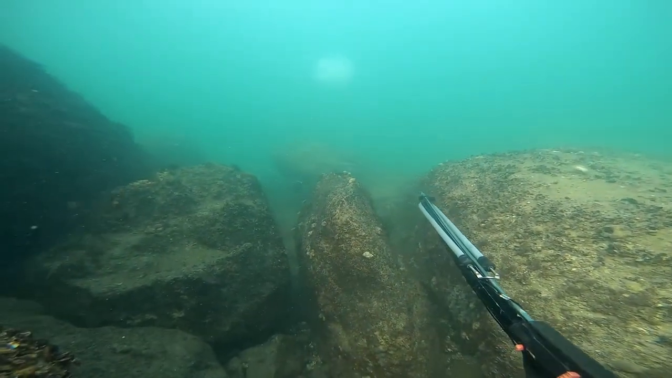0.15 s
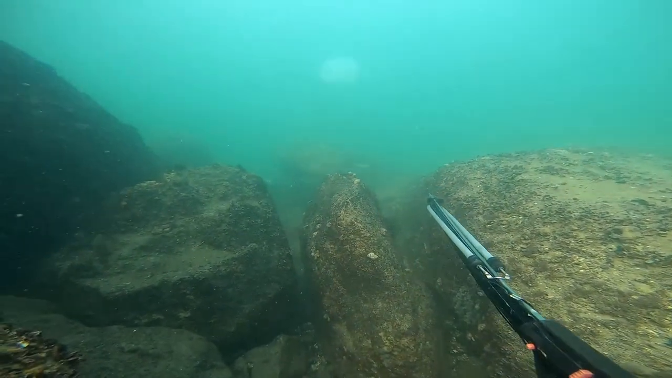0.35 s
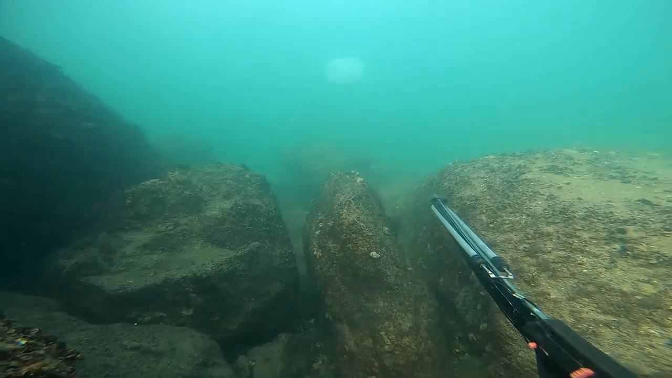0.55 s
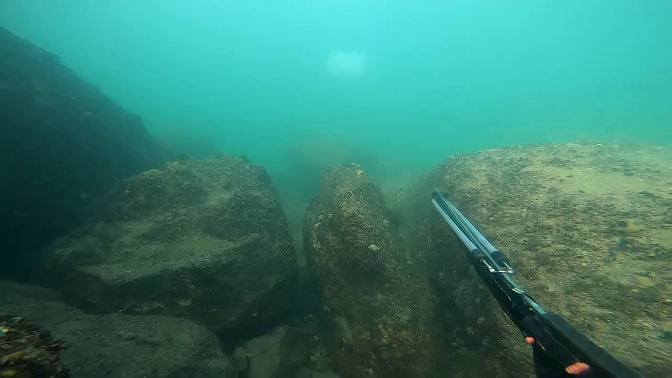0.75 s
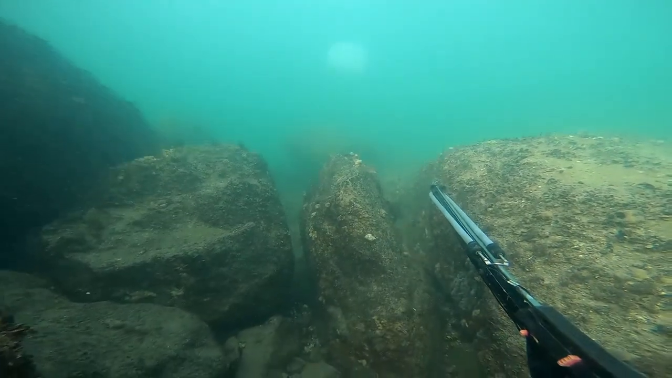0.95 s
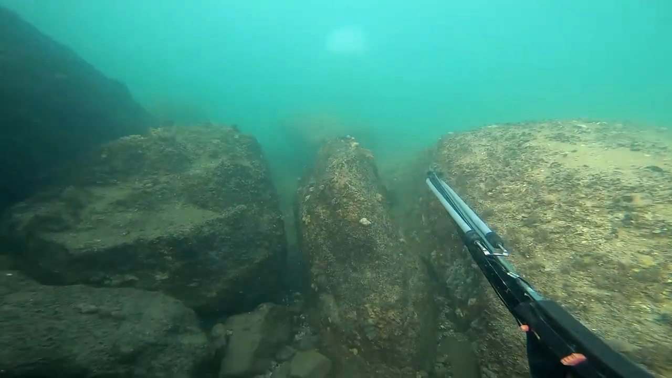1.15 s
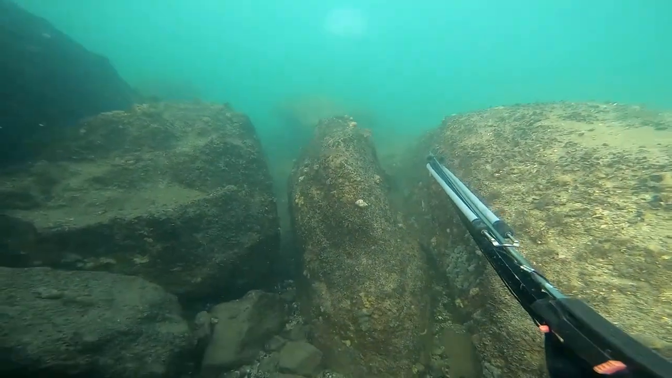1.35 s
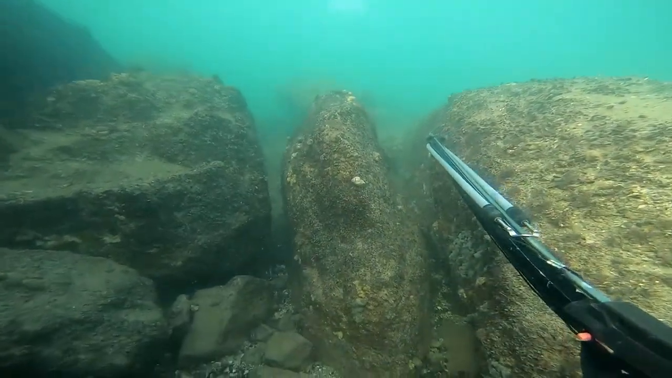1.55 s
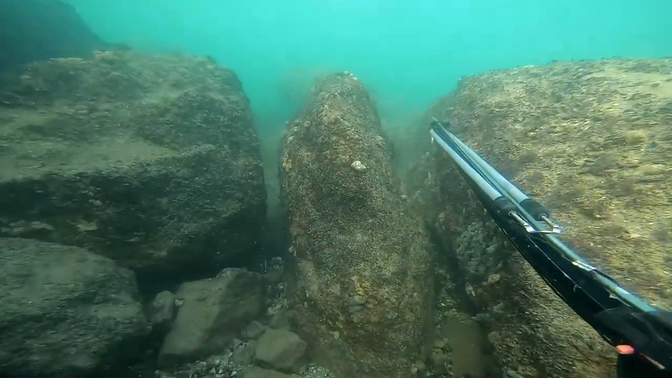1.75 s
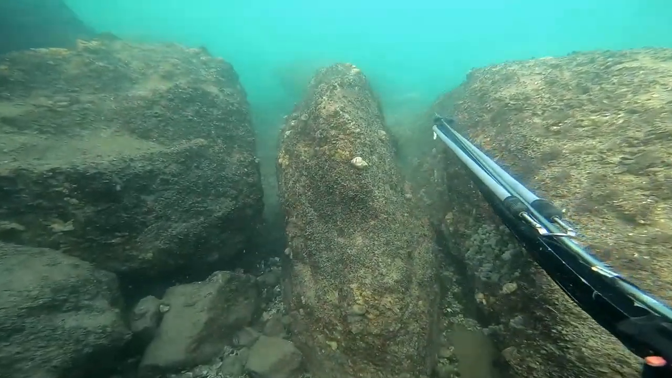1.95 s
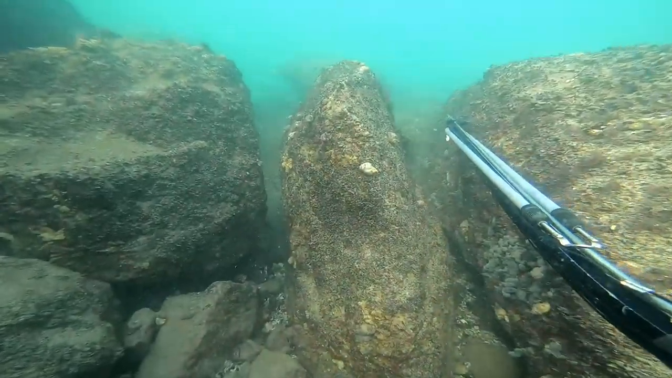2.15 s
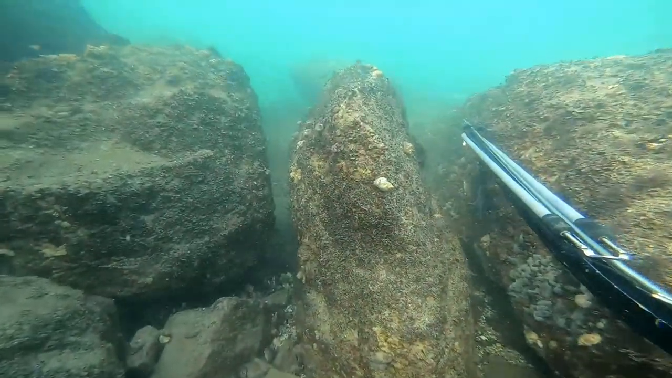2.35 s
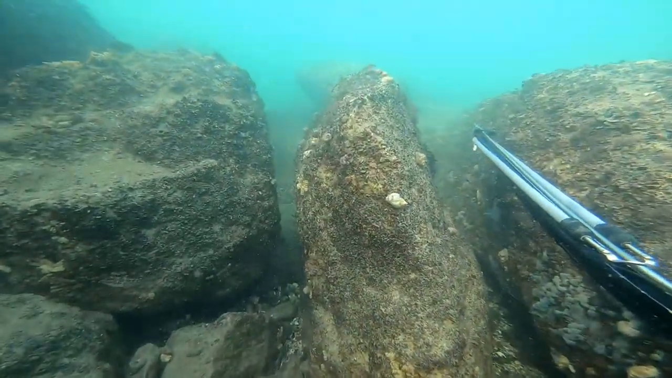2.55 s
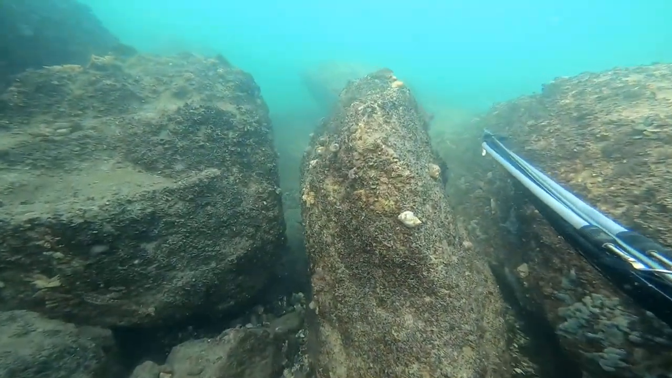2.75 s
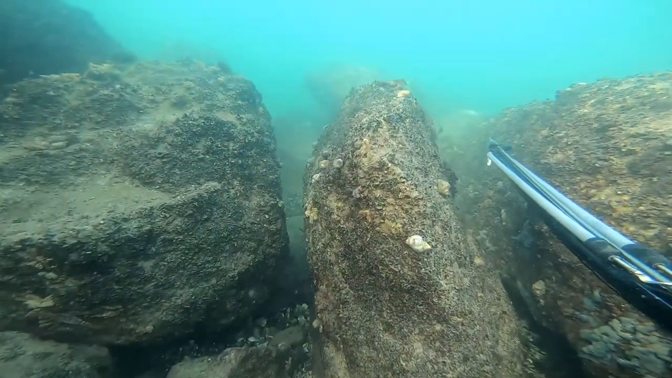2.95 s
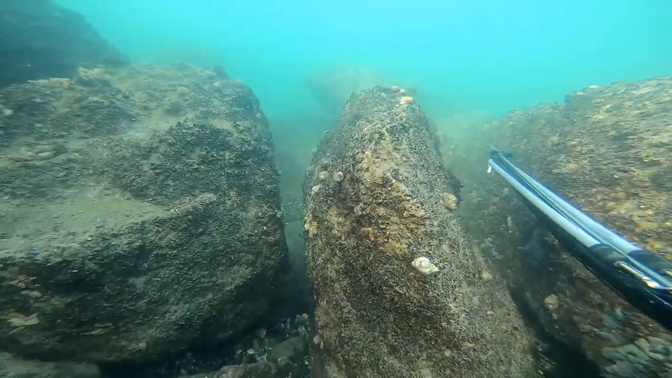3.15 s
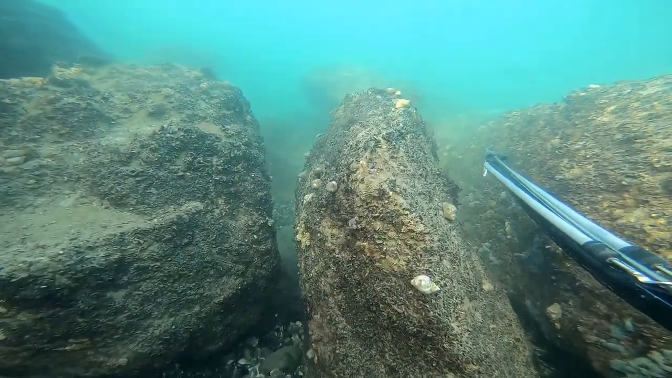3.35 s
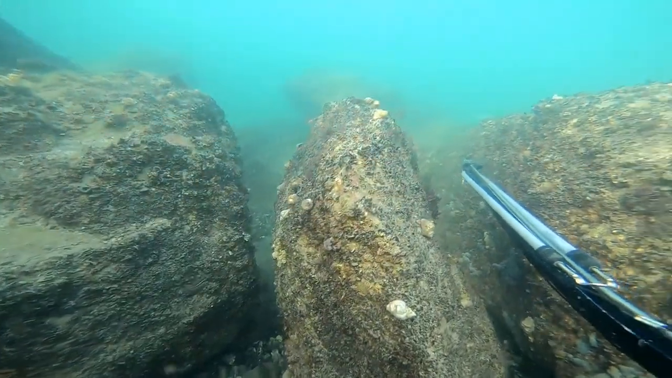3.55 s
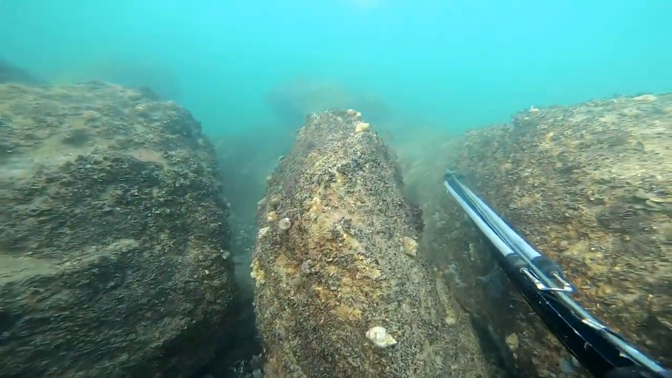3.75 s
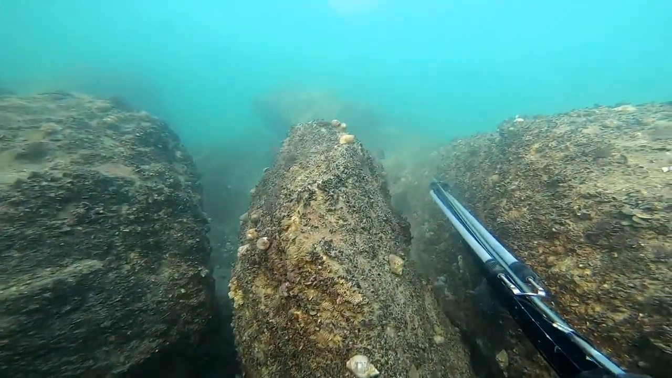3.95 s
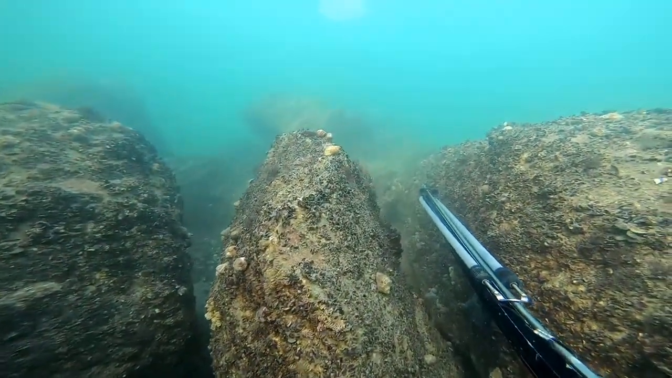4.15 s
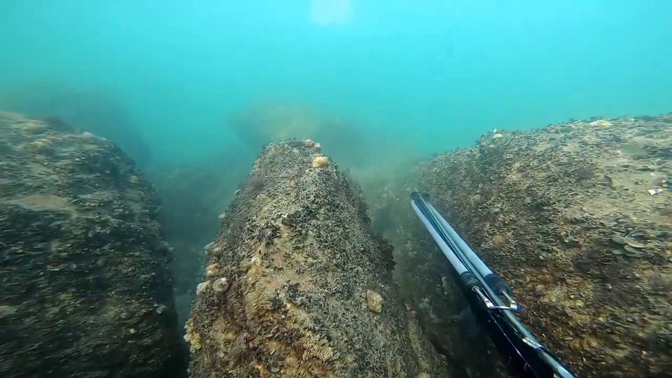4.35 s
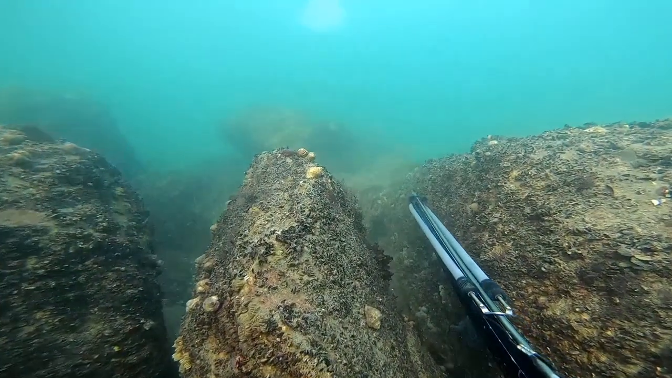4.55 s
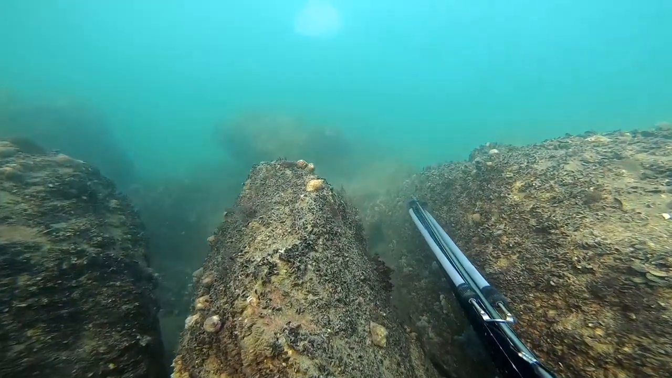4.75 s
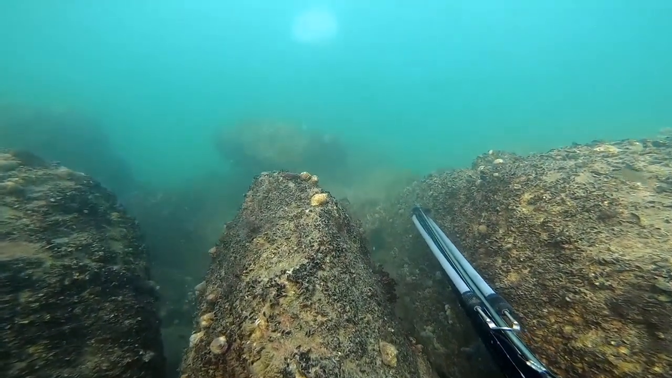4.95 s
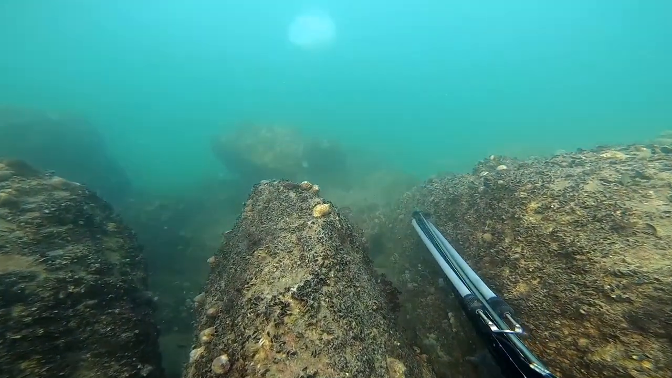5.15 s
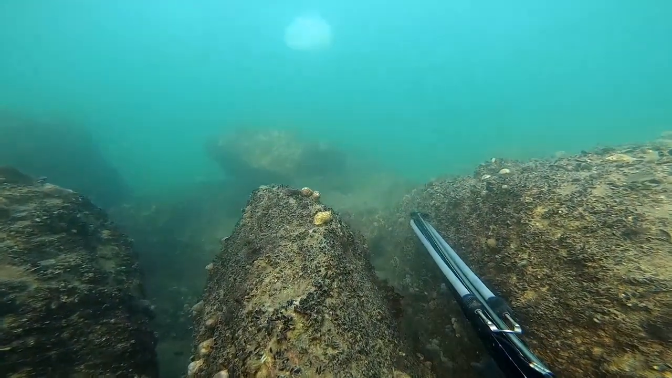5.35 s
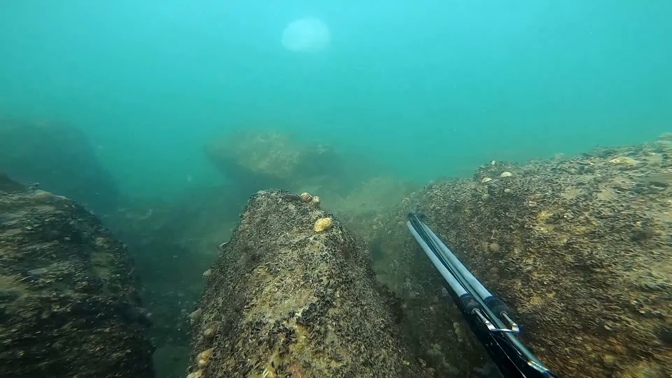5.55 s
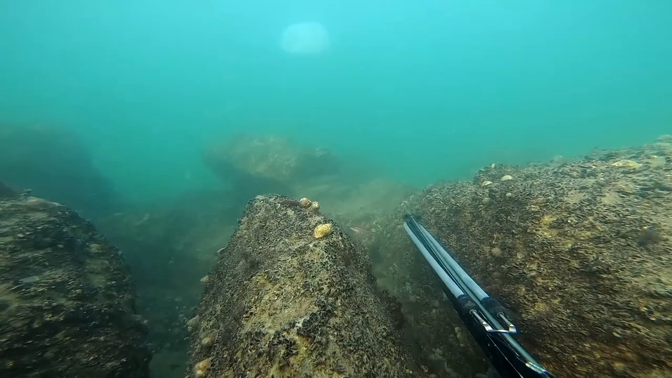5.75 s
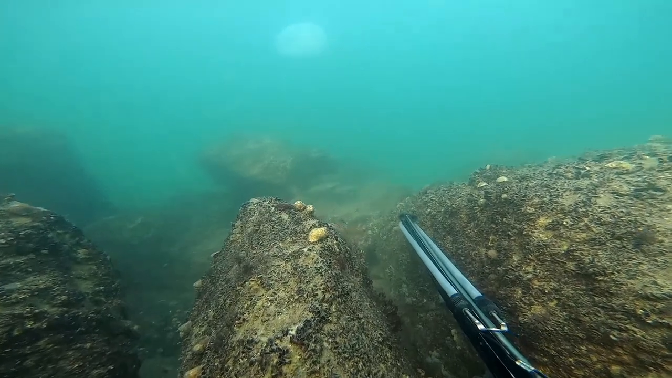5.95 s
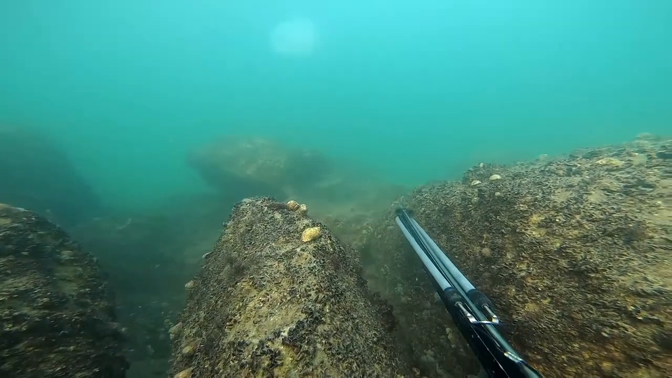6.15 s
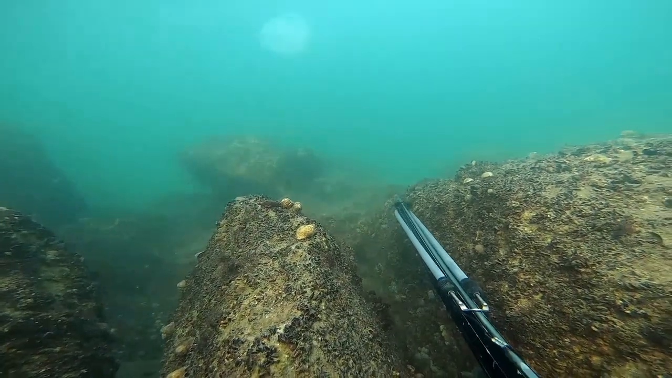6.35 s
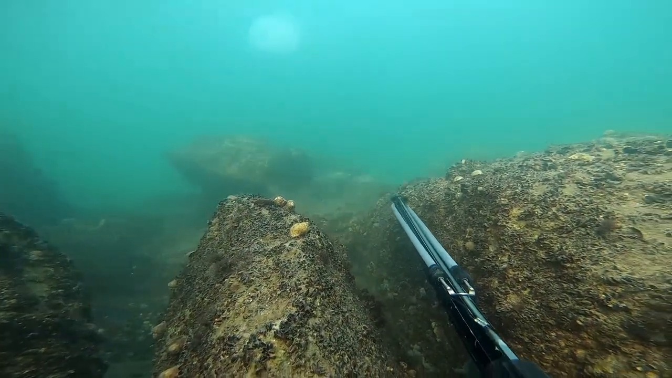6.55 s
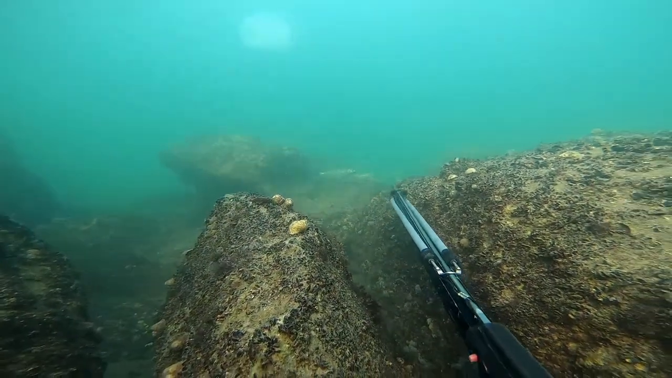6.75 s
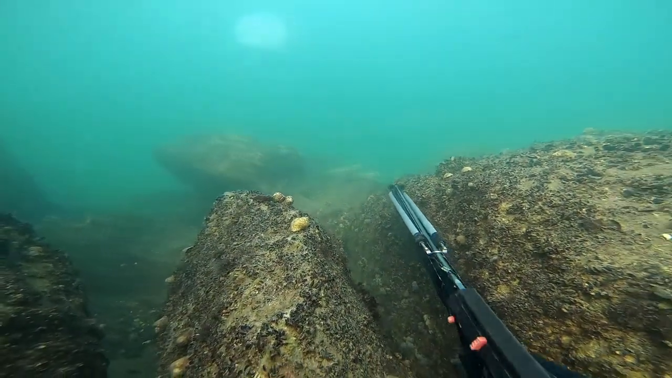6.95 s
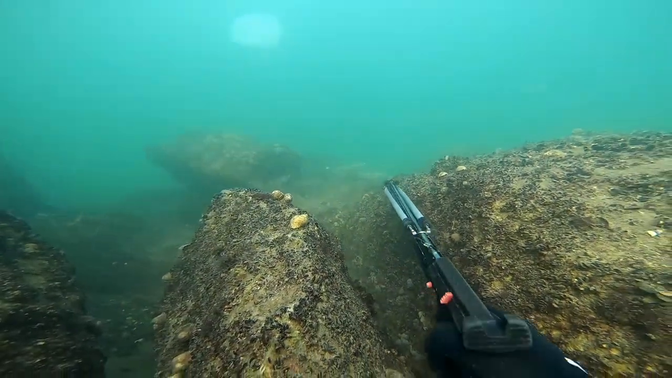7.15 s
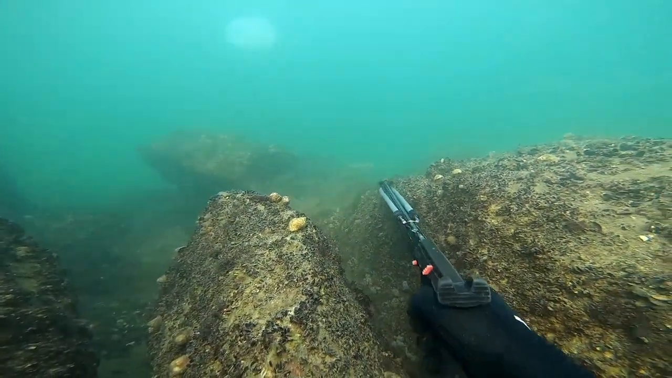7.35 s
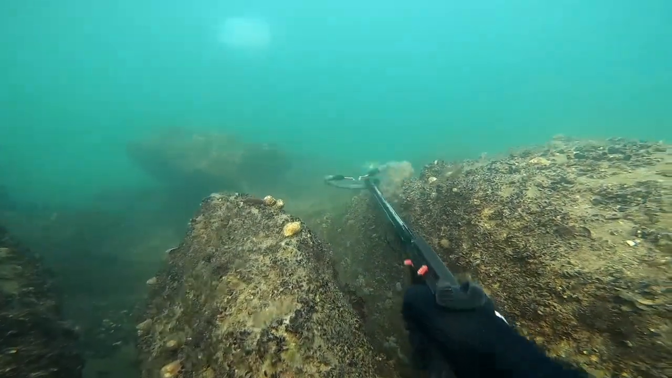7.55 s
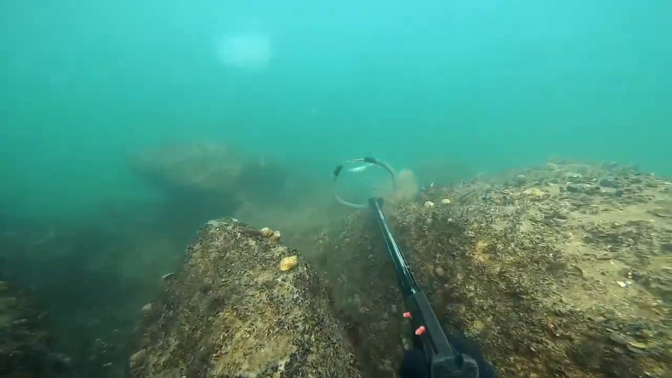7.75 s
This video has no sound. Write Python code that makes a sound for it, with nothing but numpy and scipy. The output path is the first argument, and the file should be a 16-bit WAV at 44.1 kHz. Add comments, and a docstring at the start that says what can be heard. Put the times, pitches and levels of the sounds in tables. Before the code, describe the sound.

Underwater among rocks, faint shrimp crackle runs throughout, with nearer snaps making small hollow pings on the microphone's sealed housing. Water rubs softly past over a low rumble, with slight gurgles and a few dull gear bumps. Near the end a speargun fires with one sharp, loud crack and a recoil thump, followed by a quick shaft rattle, ticking line and a faint fizz.

```python
"""A diver drifts among rocks with a camera in a sealed, ringing housing. From the start, far shrimp
crackle, water rubs past, trapped air gurgles and the swell pushes. Near snaps ping the housing, dull
bumps come through the gear, and now and then a hollow in it hums. At 7.5 s a speargun fires: trigger,
recoil, the crack of the release, then rattling shaft, bubbles, whipping line and a ring of steel.
Sounds are built as two parts: one pushes both microphones in step, the other in opposition."""
import sys
import numpy as np
from scipy import signal
from scipy.fft import rfft, irfft, next_fast_len
from scipy.io import wavfile
from scipy.ndimage import uniform_filter1d

SR = 44100
rng = np.random.default_rng(int(sys.argv[2]) if len(sys.argv) > 2 else 0)


def inscribe(sig):
    """Save sig as 16-bit PCM at rate SR to the path in sys.argv[1].

    A 1-D sig is mono; a 2-D sig holds one channel per row.
    Samples are clipped to [-1, 1] before scaling.
    """
    pcm = np.round(np.clip(np.atleast_2d(sig).T, -1, 1) * 32767)
    wavfile.write(sys.argv[1], SR, pcm.astype(np.int16))


N = 343980

# housing modes in five registers: f/Hz, width/Hz, relative in-step level/dB, relative opposed level/dB
LOW_MODES = [(145, 160, -26, -14), (183.8, 31, 5.5, -5.5), (217, 31, -9, -19.5), (295, 92, -9, -20.5),
             (454, 156, -7, -10.5), (575.4, 47, -3.5, -5)]
ROCKING_MODES = [(837, 39, -46.5, 25), (858, 97, 7.5, 18.5), (1077, 260, -18.5, 18), (1118, 112, 6, 16),
                 (1165, 50, -18.5, 5)]
RINGING_MODES = [(1443, 75, 9.5, -5.5), (1672, 100, 15.5, 9.5), (1838, 195, 4.5, -7.5), (1980, 82, 6, -41),
                 (2427.5, 120, -39, -48)]
UPPER_MODES = [(2840, 73, -5, 1.5), (3033, 270, -7.5, -13.5), (3320, 350, -6.5, -7.5),
               (3580, 320, -13, -18.5)]
TREBLE_MODES = [(4200, 500, -28, 2), (5200, 750, 0.5, 0), (5990, 610, -2.5, -4.5), (6610, 2050, -0.5, -8.5),
                (8000, 430, -8.5, -1.5), (9600, 960, -5.5, -4.5), (13100, 1000, -4, -19)]
# one entry a register, low to treble
REGISTER_BANDS = [(138, 583), (710, 1430), (1300, 1520), (2600, 2400), (4300, 7150)]  # roll-off corners: low f/Hz, high f/Hz
OPPOSED_LAGS = [3, 1.34, 1.58, 0.73, 1.08]  # how far the opposed part trails: phase/rad
CRACKLE_EQ = [-13.5, -7, -5.5, -22, -23.5]  # colour of the far crackle: gain/dB
BLUR_LEVELS = [-117, -100, -76.5, -90, -89.5]  # steady blur of the farthest snaps: level/dB

# ride of the far crackle: t/s, level/dB, brightness/dB
CRACKLE_RIDE = [(0, -60, 0.5), (.55, -61.5, 4), (.95, -57, -1), (1.1, -59.5, -1), (1.25, -50, -2),
                (1.48, -51.5, -4.5), (1.8, -58.5, 1), (2.1, -58, 2), (2.5, -63, 0.5), (3.04, -67, 1),
                (3.6, -64.5, 1), (4.17, -56.5, -2.5), (4.9, -59, 0.5), (5.3, -67, 6.5), (5.65, -64, 2),
                (5.91, -56.5, -2.5), (6.4, -61.5, 1.5), (7.08, -56, -2), (7.8, -59, 0)]
# water dragging past the housing: centre t/s, half length/s, level/dB
DRAGS = [(0.46, 0.067, -67), (0.912, 0.068, -78), (1.61, 0.12, -61), (1.906, 0.31, -69.5),
         (2.288, 0.085, -58), (2.625, .12, -55.5), (2.84, 0.18, -65.5), (3.63, .15, -73),
         (4.108, 0.071, -55.5), (4.212, 0.12, -57), (4.495, 0.072, -67), (4.755, 0.19, -63),
         (5.277, 0.14, -63), (6.02, 0.056, -57), (6.654, 0.035, -63), (7.577, 0.051, -45.5),
         (7.707, 0.059, -47)]
# slow push of the swell: t/s, level/dB
SURGE_RIDE = [(0.0, -86), (0.1, -41.5), (0.21, -77), (0.52, -34), (1.19, -55), (1.75, -41.5), (1.92, -65),
              (2.3, -42), (2.4, -53.5), (2.53, -47), (2.65, -52), (2.82, -54), (3.3, -47.5), (3.34, -46),
              (5.89, -68.5), (6.1, -55.5), (6.37, -72), (6.52, -52.5), (7.06, -61.5), (7.5, -52.5)]
# near shrimp: t/s, level/dB, pop f/Hz, relative brightness/dB, relative thud/dB, bright edge f/Hz
NEAR_SNAPS = [(0.035, -48.5, 1700, -18, -22, 6970), (0.106, -45, 840, -15.5, -11, 2950),
              (0.161, -46.5, 1110, -17, -9, 2920), (0.197, -44, 1620, -24, -5.5, 3020),
              (0.345, -50.5, 866, -13, -22, 3220), (0.367, -46, 1140, -18, -32, 6400),
              (0.429, -42.5, 1160, -16.5, -13, 2820), (0.437, -42.5, 1690, -12.5, -23, 3300),
              (0.489, -50, 1640, -22, -25, 3250), (0.582, -55, 1600, -10, -20, 2950),
              (0.751, -49, 1230, 2, -26, 3300), (0.921, -39, 1800, -28, -12, 3620),
              (0.952, -49, 853, -11, 1, 3340), (1.019, -44.5, 1770, -23, -25, 3370),
              (1.179, -43, 1640, -13, -17, 3460), (1.249, -45, 1670, -15, -15, 3300),
              (1.267, -39.5, 830, -10.5, -19, 3100), (1.315, -45, 1100, -34, -19, 3030),
              (1.358, -53, 1070, -28, -24, 3260), (1.373, -45.5, 1640, -10, -18, 3470),
              (1.431, -38.5, 1560, -28, -8, 3160), (1.487, -36, 1100, -31, -27, 3150),
              (1.501, -38, 1650, -19, -20, 3080), (1.984, -43, 1670, -17, -3, 3430),
              (2.004, -38.5, 1550, -19, -10, 3030), (2.065, -25.5, 1790, -17, -38, 2930),
              (2.151, -50, 814, -23, -18, 3240), (2.259, -53, 1650, -29, -10, 2930),
              (2.357, -50, 1680, -34, -4, 3070), (2.457, -57, 1640, -7, -3, 4930),
              (2.486, -47.5, 860, -12, 1.5, 3150), (2.63, -46.5, 1760, -39, 6.5, 2950),
              (2.687, -47.5, 850, -17, 0, 5600), (2.781, -47, 820, -33, -6, 3010),
              (2.914, -43.5, 855, -16, -18, 3120), (2.978, -42, 1180, -20.5, -29, 3330),
              (3.031, -37.5, 770, -35, 1, 3020), (3.043, -49.5, 1090, -13, 2, 4930),
              (3.232, -47.5, 850, -21, -22, 2990), (3.301, -46.5, 1340, -15, -18, 6840),
              (3.355, -50, 1360, -39, 1.5, 3270), (3.448, -47.5, 1130, -17, -10, 3480),
              (3.476, -55, 1130, -11, -17, 2910), (3.663, -55.5, 1090, -14, -11, 5560),
              (3.752, -51, 1030, -16, -15, 4840), (3.773, -52, 1090, -12, -21, 3220),
              (3.844, -52, 1670, -2, -16, 3330), (3.855, -45.5, 874, -9, -17, 4800),
              (3.951, -46.5, 1130, -14.5, -25, 2980), (3.994, -51, 1180, -16, -11, 3840),
              (3.998, -42, 1170, -14.5, 1, 3110), (4.069, -43.5, 820, -39, -9, 3000),
              (4.093, -46.5, 837, -35, -7, 3110), (4.134, -45, 1670, -16, -11, 3300),
              (4.161, -43, 872, -25, -12, 2990), (4.263, -52, 1700, -11, -12, 3150),
              (4.31, -42.5, 1760, -9, -1.5, 5550), (4.398, -48, 880, -20, -24, 6240),
              (4.554, -48, 795, -13, -22, 5780), (4.664, -44.5, 1700, -13, -11, 3440),
              (4.698, -45.5, 1630, -14, -3, 2980), (4.741, -48, 1800, -17, -2, 3020),
              (4.778, -42, 1130, -20, -26, 3470), (4.843, -46, 1150, -31, -19, 3170),
              (4.917, -32.5, 1565, -17, -23, 2930), (4.96, -49.5, 1150, -10, -21, 2900),
              (5.023, -52.5, 856, -35, 3.5, 3100), (5.115, -48.5, 820, -27, -18, 5400),
              (5.182, -49, 1170, -22, -22, 6430), (5.217, -48, 1330, -15, -21, 5500),
              (5.234, -47.5, 1640, -17, -17, 2900), (5.26, -43, 1660, -18, -16, 3350),
              (5.275, -46.5, 1680, -11, -16, 6030), (5.321, -45.5, 845, -17, -17, 3060),
              (5.367, -45, 1120, -17, -28, 5860), (5.395, -50.5, 880, -27, -6, 3350),
              (5.468, -53.5, 1650, -12, -7, 3430), (5.502, -48.5, 1750, -20, -22, 3450),
              (5.53, -48.5, 856, -16, -7, 3440), (5.551, -48.5, 1730, -13.5, -9, 3360),
              (5.571, -43.5, 1530, -26, -13, 3020), (5.625, -46.5, 1120, -20, -27, 5410),
              (5.751, -45.5, 1170, -17, -27, 3250), (5.767, -45, 1610, -21, -12, 3340),
              (5.907, -48, 1650, -14, -21, 3180), (5.955, -45.5, 1640, -12.5, -13, 3140),
              (6.202, -47.5, 1400, -11.5, -7, 5300), (6.237, -43, 1570, -31, -16, 3050),
              (6.269, -54, 1700, -8, -6, 2990), (6.365, -45.5, 900, -15, -21, 3030),
              (6.397, -57.5, 840, -0.5, -5, 4970), (6.473, -49, 1540, -16, -13, 5740),
              (6.545, -49.5, 1710, -1.5, -9, 4900), (6.559, -47.5, 1630, -13, -25, 3430),
              (6.616, -42.5, 1730, -43, -22, 2950), (6.657, -49, 1580, -21, -17, 3470),
              (6.68, -34, 930, -15.5, -20, 6200), (6.886, -44.5, 1700, -9, -14, 3370),
              (6.906, -42, 810, -25, -29, 3210), (6.979, -43.5, 1700, -29, -24, 3050),
              (7.036, -44, 770, -30, -14, 3120), (7.197, -44, 1790, -24, -25, 6070),
              (7.239, -46, 1730, -27, -15, 3450), (7.247, -50, 1750, -11.5, -17, 6110),
              (7.272, -39, 1560, -22.5, -27, 6000), (7.383, -43, 1110, -14.5, -29, 4950),
              (7.451, -49, 1330, -15, -13, 6100), (7.48, -45.5, 1170, -15, -23, 3310)]
# dull bumps through the diver's body and gear: t/s, level/dB, f/Hz
BODY_BUMPS = [(0.075, -20.5, 58.3), (0.076, -34, 172), (0.799, -39.5, 177), (0.847, -30, 165),
              (0.951, -44, 176), (1.004, -38, 174), (1.183, -40.5, 175), (1.418, -26, 50.4),
              (1.55, -34.5, 184), (1.92, -40, 171), (2.26, -28.5, 172), (2.272, -25, 55),
              (2.483, -33.5, 157), (2.597, -51, 172), (3.031, -34, 167), (3.241, -33.5, 53.3),
              (4.073, -32.5, 225), (4.307, -45, 312), (4.479, -40.5, 221), (4.676, -42.5, 223),
              (4.849, -44, 242), (5.237, -44, 176), (5.6, -45, 370), (5.885, -38, 292), (5.955, -41, 307),
              (5.992, -42.5, 360), (6.557, -28, 175), (6.611, -26.5, 79), (6.617, -25.5, 144)]
# a hollow in the gear humming: centre t/s, half length/s, level/dB, f/Hz
HOLLOW_HUMS = [(0.954, 0.094, -56, 178), (1.62, 0.11, -49.5, 187), (1.85, 0.14, -53.5, 176),
               (2.3, 0.072, -48.5, 175), (4.156, 0.11, -50.5, 225), (4.748, .15, -58, 225),
               (7.3, .2, -60, 183)]
# trigger, release, shaft rattling out, line snapping tight, a tick on the shaft:
# t/s, level/dB, pop f/Hz, relative brightness/dB, relative thud/dB
SHOT_KNOCKS = [(7.526, -37, 1720, -11, -2), (7.537, -30.5, 2200, -5, -0.5), (7.5508, -14.5, 1220, -17, -11),
               (7.5628, -29, 1560, -6, -1.5), (7.5678, -23, 1580, -13, -16),
               (7.5718, -14.5, 1440, -24, -23), (7.5764, -17.5, 1460, -22, -18),
               (7.5813, -18, 1590, -15.5, -13), (7.586, -21, 1500, -13.5, -10),
               (7.5919, -25, 1580, -13, -13), (7.6068, -31, 1520, -22, -0.5),
               (7.6119, -27.5, 1530, -13, -4), (7.668, -51, 1400, -3, -8), (7.734, -47, 1710, -8, -10)]
# kick of the gun: t/s, level/dB, f/Hz, t60/s
RECOIL_JOLTS = [(7.5426, -5.5, 73, 0.086), (7.5467, -5, 172.6, 0.078), (7.575, -8.5, 61.4, 0.095),
                (7.604, -13, 21.3, .3), (7.6066, -11, 276, 0.051), (7.618, -14, 136, 0.087),
                (7.694, -23, 162, 0.041), (7.769, -27.5, 164, 0.042)]
# the sear slips, then lets the shaft go: t/s, level/dB
SEAR_SLIPS = [(7.5463, -13), (7.5479, 3.5)]
# ring of the gun, choked by hand and water: f/Hz, in-step level/dB, opposed level/dB, t60/s
GUN_MODES = [(1090, -37, -1, 0.012), (1270, -8.5, -15, 0.018), (1736, -4.5, -32, 0.0092),
             (2080, -0.5, -13, 0.0068), (3390, -8.5, -28, 0.0067), (4750, -18, -18, 0.0099),
             (7080, -14, -30, 0.0055), (10600, -37, -39, 0.0088), (15500, -48, -48, .006)]
# the line running out and whipping: t/s, tick level/dB, relative brightness/dB
LINE_RIDE = [(7.555, -50, -8), (7.6, -38, -15), (7.63, -44, -17), (7.685, -57, -14), (7.705, -39, -19),
             (7.725, -43.5, -21), (7.75, -42, -16.5), (7.8, -52, -30)]
# steel shaft: f/Hz, level/dB, t60/s, flutter width/Hz; then the start of its ring
SHAFT_MODES, SHAFT_RING_S = [(2445, -41, .4, 50), (7150, -61.5, .9, 420)], 7.588

SHOT_EDGE_HZ, SHOT_UPPER_DB = 3100, -1  # bright edge and upper-mode trim of shot knocks and line ticks


def amp(db):
    return 10 ** (np.asarray(db) / 20)


def unit_rms(x):
    return x / np.sqrt(np.mean(x ** 2, axis=-1, keepdims=True) + 1e-30)


def curve(points, t):
    times, *columns = np.transpose(points)
    return np.squeeze([np.interp(t, times, column) for column in columns])


def add(mix, start_s, sound):
    part = mix[..., round(start_s * SR):][..., :sound.shape[-1]]
    part += sound[..., :part.shape[-1]]


def wobble(span):
    """Two slow random modulators, smoothed twice over span samples."""
    return unit_rms(uniform_filter1d(uniform_filter1d(rng.standard_normal((2, N)), span), span))


def resonance(f, hz, width_hz):
    """One damped mode, with unit gain at its pitch."""
    return 1j * width_hz * f / (hz ** 2 - f ** 2 + 1j * width_hz * f)


def housing(size):
    """The housing's colour as summed modes, indexed (register, in-step or opposed, bin)."""
    f, out = np.fft.rfftfreq(size, 1 / SR) + 1e-3, []
    registers = LOW_MODES, ROCKING_MODES, RINGING_MODES, UPPER_MODES, TREBLE_MODES
    for modes, (low_hz, high_hz), lag in zip(registers, REGISTER_BANDS, OPPOSED_LAGS):
        hz, width_hz, *db = np.transpose(modes)[..., None]
        gains = amp(db)
        if modes is ROCKING_MODES:
            gains[1, 1::2] *= -1  # neighbours rock opposite ways
        response = (gains * resonance(f, hz, width_hz)).sum(axis=1)
        for ratio in (-low_hz / f, f / high_hz):  # stiffness below, mass above: steep skirts
            response /= (1 - ratio ** 2 + 1j * np.sqrt(2) * ratio) ** 2
        response[1] *= np.exp(-1j * lag)
        out.append(response / np.sqrt(np.mean(abs(response[0]) ** 2)))
    return np.array(out)


def pressure(shape, alike=0.33):
    """White pressure on the housing; in-step and opposed modes feel it partly alike."""
    shared, own = rng.standard_normal((2, *shape))
    return np.stack([shared, alike * shared + np.sqrt(1 - alike ** 2) * own], axis=-2)


def far_crackle(t, snaps_per_s=140, ticks_per_s=45, spread_db=6, colour_db=11, t60_s=0.084, hiss_db=-9):
    """Envelope, one a register, of countless far shrimp snaps over their own blur."""
    ride_db, bright_db = curve(CRACKLE_RIDE, t)
    size_db = spread_db * np.minimum(rng.exponential(1, N), 2.8)
    size_db = size_db + colour_db * np.clip(rng.standard_normal((5, N)), -3, 1.6)
    snaps = amp(size_db) * (rng.random(N) < snaps_per_s / SR)
    snaps[4] += 1.94 * amp(size_db[0]) * (rng.random(N) < ticks_per_s / SR)  # thin treble-only ticks
    tails = signal.lfilter([1], [1, -amp(-60 / (t60_s * SR))], snaps)
    bursts = unit_rms(uniform_filter1d(tails, size=60))
    envelope = unit_rms(bursts + amp(hiss_db)) * amp(ride_db + np.array(CRACKLE_EQ)[:, None])
    envelope[3:] *= amp(bright_db)
    return envelope + amp(BLUR_LEVELS)[:, None]


def water_bed(floor_db=-72.5, lump_db=2.84):
    """Far crackle and rubbing water ring the housing, over the surge and the gurgle."""
    t, size = np.arange(N) / SR, next_fast_len(N + 4096)
    drag_power = sum(amp(2 * db) * np.exp(-2 * ((t - s) / half) ** 2) for s, half, db in DRAGS)
    rubbing_db = 10 * np.log10(drag_power + amp(2 * floor_db))
    envelope = far_crackle(t)
    envelope[:2] += amp(rubbing_db + lump_db * wobble(900) + [[0], [-9]])  # lumpy rub in the low end
    drive = pressure((5, N)) * envelope[:, None]
    rung = irfft(rfft(drive, size) * housing(size), size)[..., :N].sum(axis=0)
    return rung + surge(t) + gurgle(amp(rubbing_db - 4))


def surge(t, band_hz=(7, 33)):
    """The swell leans on the housing: a slow sub rumble."""
    band = signal.butter(2, band_hz, "bandpass", fs=SR, output="sos")
    heave = signal.sosfilt(band, pressure((N,)))
    heave /= np.sqrt(uniform_filter1d(heave ** 2, size=9000) + 1e-12)  # level it before the ride
    ride = amp(curve(SURGE_RIDE, t) + [[0], [-17]])
    return unit_rms(signal.sosfilt(band, heave)) * ride * [[1], [-1]]


def gurgle(level, per_s=75, low_hz=190, high_hz=800, cycles=10, climb=0.28, sizes=24):
    """Trapped air squeezed about: small bubbles whose pitch climbs as they die, the high ones weaker."""
    out = np.zeros(N)
    for hz in np.geomspace(low_hz, high_hz, sizes):
        age = np.arange(3000) / SR * hz / cycles
        envelope = age * np.exp(-4.5 * age) * (low_hz / hz) ** 0.51
        blip = envelope * np.sin(2 * np.pi * cycles * (age + climb * age ** 2))
        births = (rng.random(N) < per_s / sizes / SR) * rng.standard_normal(N)
        out += signal.oaconvolve(births, blip)[:N]
    return unit_rms(out) * level * amp([[0], [-12]])


def knocks(rows, t60_s, upper_db, opposed_db, upper_per_db=0, attack_s=0.00053, size=4096):
    """A sharp pulse and its fading scatter off the rocks ring the housing, most near the pop's pitch."""
    split_hz, rocking_db_per_oct, ringing_db_per_oct = 1282, 24.5, 21.5  # low pops rock, high ones ring
    edge_split_hz, edge_db_per_oct = 3740, 3.5  # a low edge tilts the treble toward the upper modes
    usual_db = -44  # hits above this gain upper modes by upper_per_db
    t, f = np.arange(size) / SR, np.fft.rfftfreq(size, 1 / SR)
    response, out = housing(size), np.zeros((2, N))
    share = np.sqrt((abs(response) ** 2).mean(axis=-1, keepdims=True))
    for s, db, pop_hz, bright_db, thud_db, edge_hz in rows:
        burst = pressure((5, size)) * amp(-60 * t / t60_s) * (1 - np.exp(-t / attack_s))
        burst[..., 0] -= 2.78  # the direct pulse
        boost = 1 + 2.17 * resonance(f, pop_hz, width_hz=160) + 1.5 * resonance(f, edge_hz, width_hz=900)
        rung = irfft(rfft(burst) * boost * response, size)
        rung *= share / abs(rung).max(axis=-1, keepdims=True)
        tilt_db = edge_db_per_oct * np.log2(edge_hz / edge_split_hz)
        octaves = np.log2(pop_hz / split_hz)
        register_db = [thud_db, -rocking_db_per_oct * max(octaves, 0), ringing_db_per_oct * min(octaves, 0),
                       bright_db + upper_db + upper_per_db * (db - usual_db) - tilt_db,
                       bright_db + tilt_db]
        levels = amp(db + np.array(register_db)[:, None] + [0, opposed_db])
        add(out, s, (levels[..., None] * rung).sum(axis=0))
    return out


def near_shrimp():
    """Snaps ping the housing; the nearer, louder ones keep more of the upper modes."""
    return knocks(NEAR_SNAPS, t60_s=0.03, upper_db=-1.5, opposed_db=-2, upper_per_db=0.39)


def jolts(rows, attack_per_cycle, opposed_db=-22):
    """Bumps and recoil: soft-fronted low swings that move both microphones together."""
    t, out = np.arange(SR // 3) / SR, np.zeros(N)
    for s, db, hz, t60 in rows:
        attack = 1 - np.exp(-attack_per_cycle * hz * t)
        add(out, s, amp(db - 60 * t / t60) * attack * np.sin(2 * np.pi * hz * t))
    return out * amp([[0], [opposed_db]]) * [[1], [-1]]


def hollow_hum(waver_hz=40, opposed_db=-20):
    """Now and then a hollow in the gear hums: a wavering low tone that swells and sinks."""
    t, out = np.arange(N) / SR, np.zeros(N)
    real, imag = wobble(int(SR / waver_hz))
    for s, half, db, hz in HOLLOW_HUMS:
        tone = ((real + 1j * imag) * np.exp(2j * np.pi * hz * t)).real
        out += amp(db) * np.exp(-((t - s) / half) ** 2) * tone
    return out * amp([[0], [opposed_db]]) * [[1], [-1]]


def gun_clatter():
    """Trigger, shaft and line knock hard, and the housing rings with each hit."""
    rows = [(*row, SHOT_EDGE_HZ) for row in SHOT_KNOCKS]
    return knocks(rows, t60_s=0.022, upper_db=SHOT_UPPER_DB, opposed_db=-2.5)


def release_crack(attack_s=0.0003):
    """Each slip of the sear strikes all modes of the gun at once."""
    t, out = np.arange(2000) / SR, np.zeros((2, N))
    ring = sum(amp(np.array([[step_db], [opposed_db]]) - 60 * t / t60) * np.sin(2 * np.pi * hz * t)
               for hz, step_db, opposed_db, t60 in GUN_MODES)
    for s, db in SEAR_SLIPS:
        add(out, s, -amp(db) * ring * (1 - np.exp(-t / attack_s)))
    return out


def bubble_spray(start_s=7.555, db=-61, t60_s=0.33, band_hz=(7800, 13500), per_s=3500, spread_db=2.5):
    """Fine bubbles torn off by the shaft fizz wide across the stereo field."""
    t, out = np.arange(SR // 3) / SR, np.zeros((2, N))
    pops = amp(spread_db * rng.exponential(1, (len(t), 2)).T) * (rng.random((2, len(t))) < per_s / SR)
    grains = uniform_filter1d(pops, size=40) * rng.standard_normal((2, len(t)))
    band = signal.butter(4, band_hz, "bandpass", fs=SR, output="sos")
    add(out, start_s, unit_rms(signal.sosfilt(band, grains)) * amp(db - 60 * t / t60_s))
    return out


def line_ticks(per_s=240, low_hz=860, high_hz=2050, spread_db=3.5, thud_db=-8.5):
    """The line pays out in uneven ticks of random pitch that ring the housing."""
    slots = np.arange(LINE_RIDE[0][0], N / SR, 1 / per_s)
    late, pitch, strength, edge = rng.random((len(slots), 4)).T
    times = slots + late / per_s
    db, bright_db = curve(LINE_RIDE, times)
    db += spread_db * (2 * strength - 1)
    pop_hz = low_hz * (high_hz / low_hz) ** pitch
    edge_hz = SHOT_EDGE_HZ * 2 ** (edge - .5)
    rows = np.transpose([times, db, pop_hz, bright_db, np.full_like(times, thud_db), edge_hz])
    return knocks(rows, t60_s=0.024, upper_db=SHOT_UPPER_DB, opposed_db=-3)


def shaft_ring(attack_s=0.01, opposed_db=-7):
    """The freed steel shaft rings on, fluttering as it flexes."""
    t, out = np.arange(SR // 3) / SR, np.zeros(N)
    for hz, db, t60, width_hz in SHAFT_MODES:
        real, imag = unit_rms(uniform_filter1d(rng.standard_normal((2, len(t))), int(SR / width_hz)))
        tone = ((0.61 + real + 1j * imag) * np.exp(2j * np.pi * hz * t)).real
        add(out, SHAFT_RING_S, amp(db - 60 * t / t60) * (1 - np.exp(-t / attack_s)) * tone)
    return out * amp([[0], [opposed_db]])


def scene(bump_t60_s=0.071):
    """Lay the shot over the reef; sum and difference of the two parts give left and right."""
    shot = release_crack() + gun_clatter() + jolts(RECOIL_JOLTS, attack_per_cycle=1.4)
    shot += shaft_ring() + bubble_spray() + line_ticks()
    bumps = jolts([(*row, bump_t60_s) for row in BODY_BUMPS], attack_per_cycle=1)
    in_step, opposed = near_shrimp() + water_bed() + hollow_hum() + bumps + shot
    return np.array([in_step + opposed, in_step - opposed])


def record(dry, ceiling=0.97, cutoff_hz=16400):
    """Faint circuit hiss, soft overload near full scale, then the band limit."""
    noisy = dry + signal.lfilter([1], [1, -.8], rng.standard_normal(dry.shape)) * amp(-101)
    clipped = ceiling * np.tanh((abs(noisy) / ceiling) ** 3) ** (1 / 3) * np.sign(noisy)
    lowpass = signal.firwin(511, cutoff_hz, window=("kaiser", 9), fs=SR)
    return signal.oaconvolve(clipped, lowpass[None], "same")


dry = scene()
out = record(dry)
inscribe(out)
```